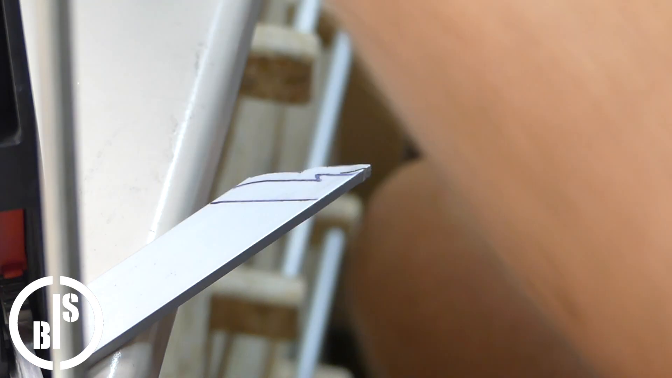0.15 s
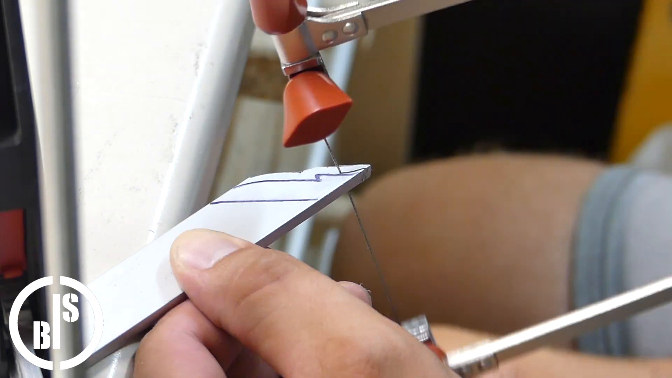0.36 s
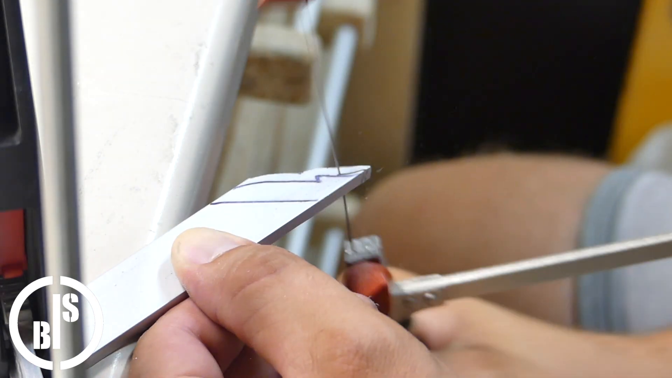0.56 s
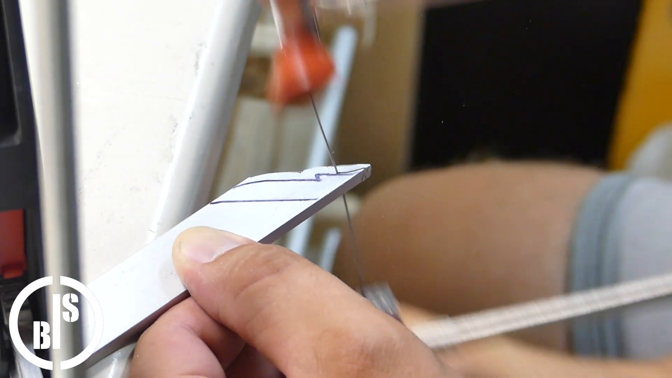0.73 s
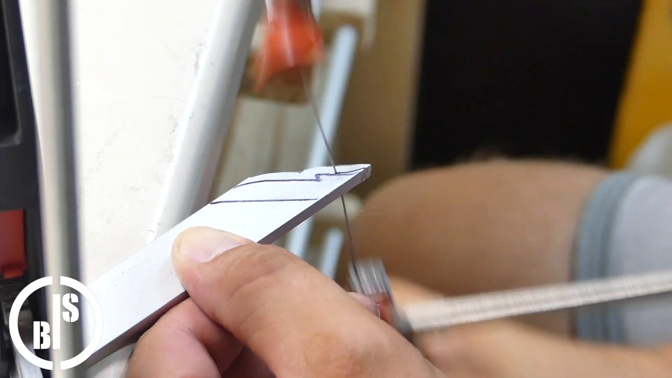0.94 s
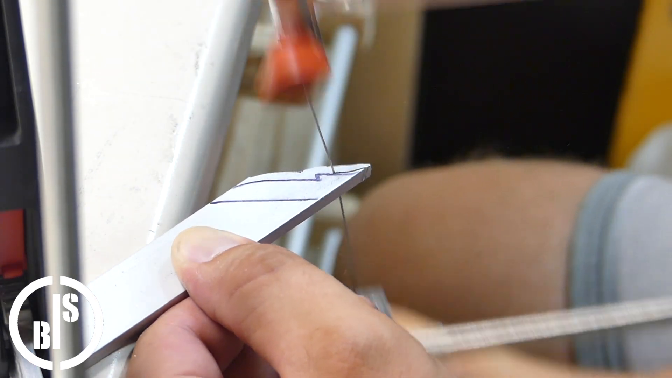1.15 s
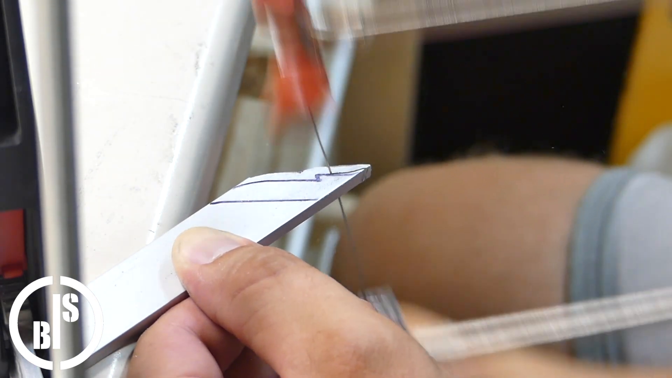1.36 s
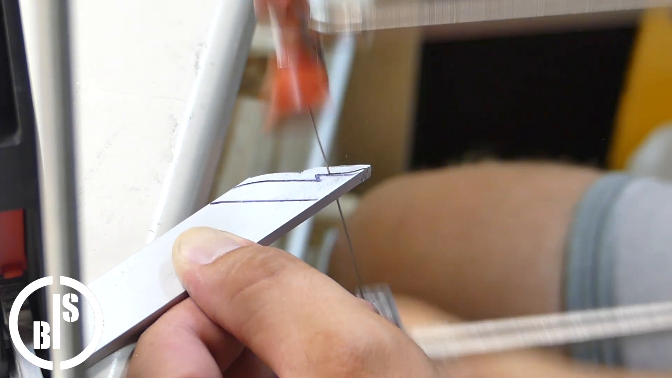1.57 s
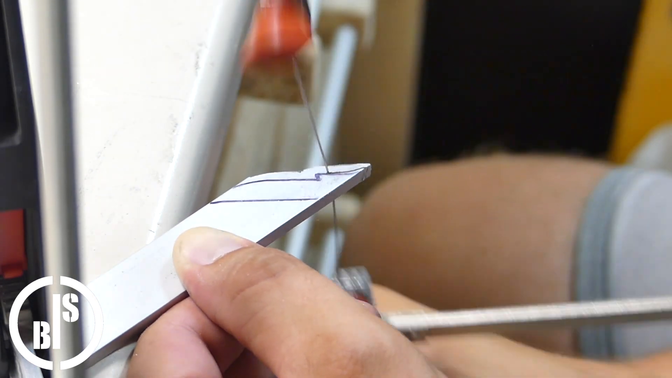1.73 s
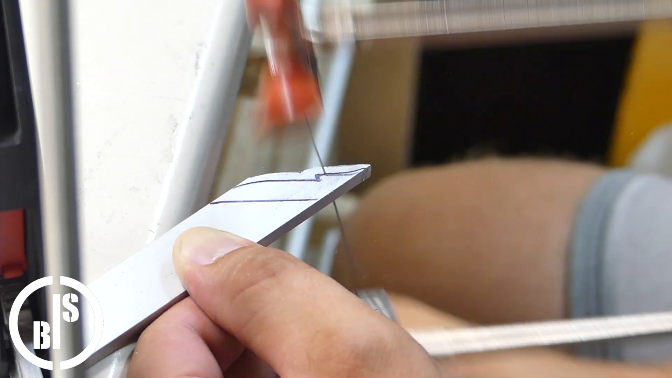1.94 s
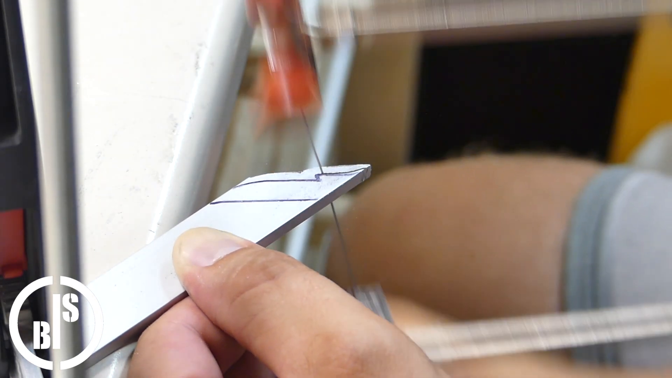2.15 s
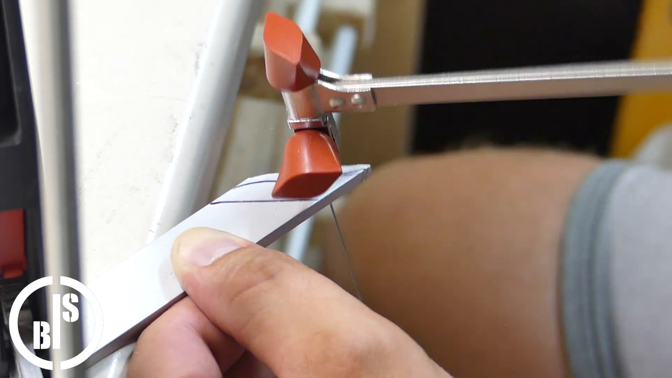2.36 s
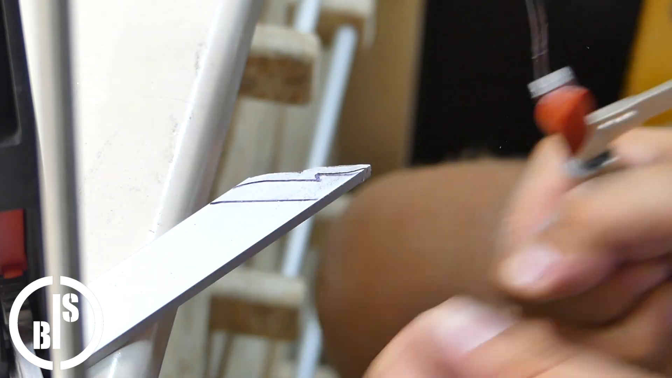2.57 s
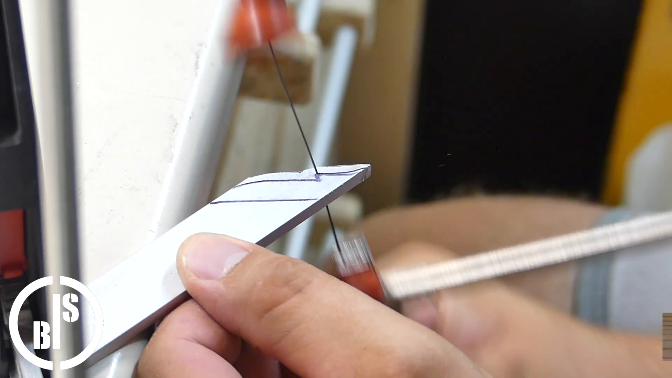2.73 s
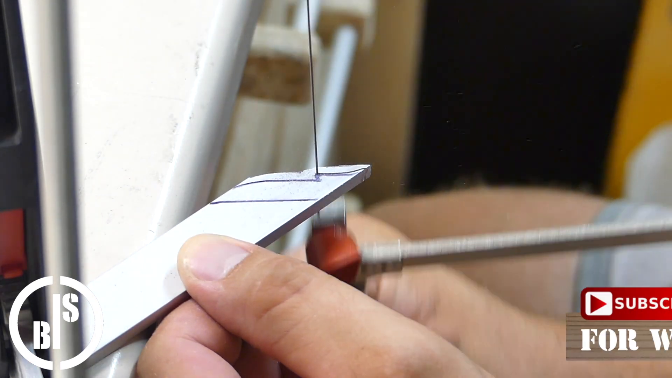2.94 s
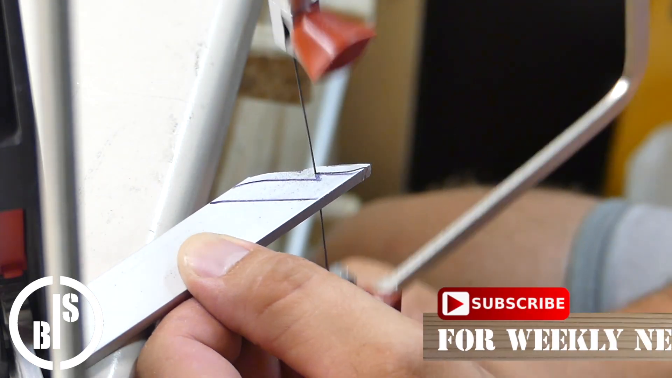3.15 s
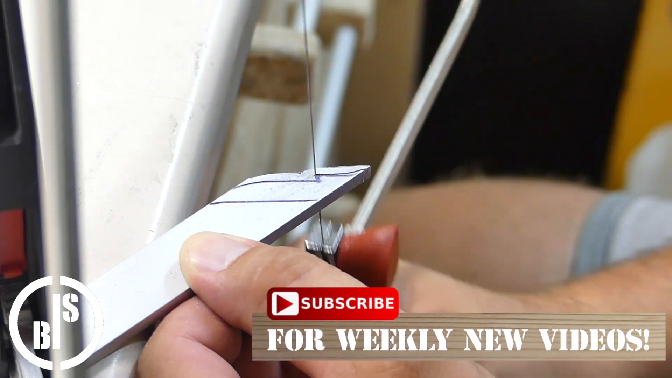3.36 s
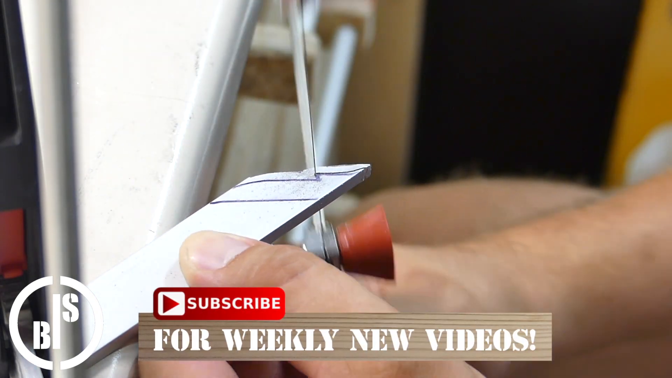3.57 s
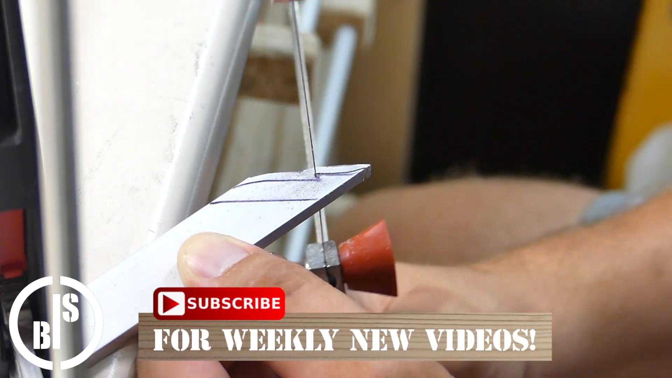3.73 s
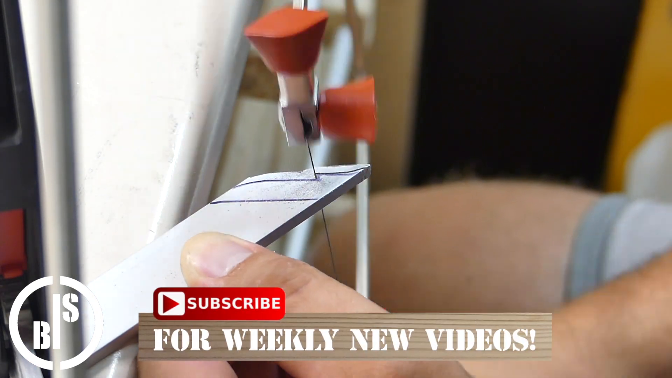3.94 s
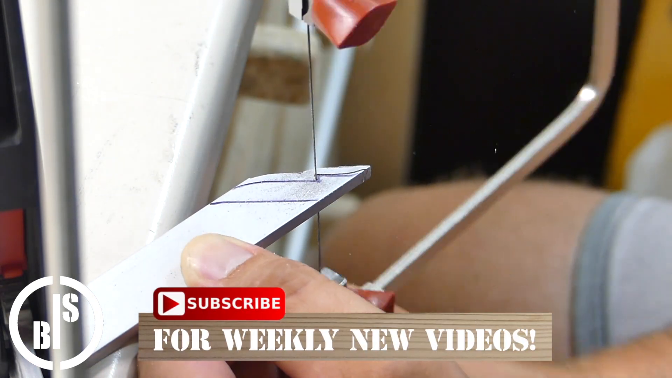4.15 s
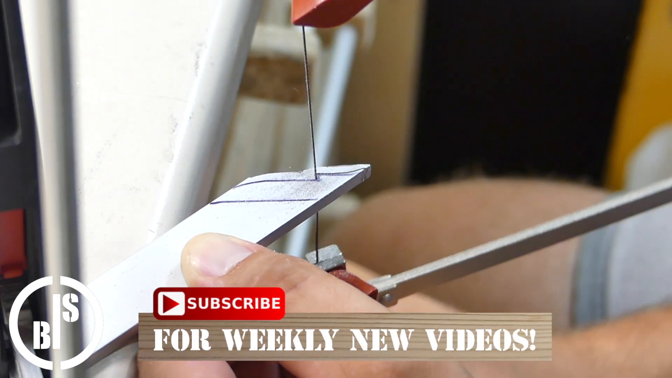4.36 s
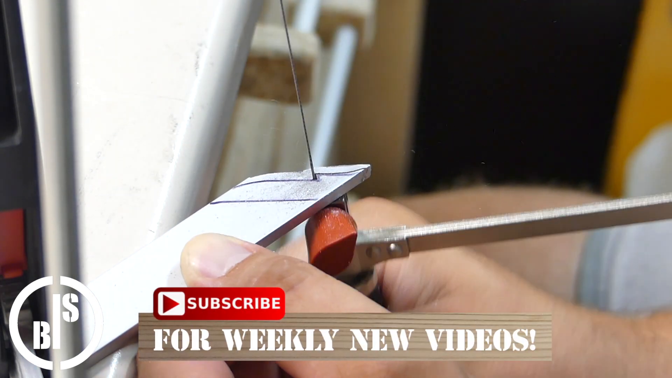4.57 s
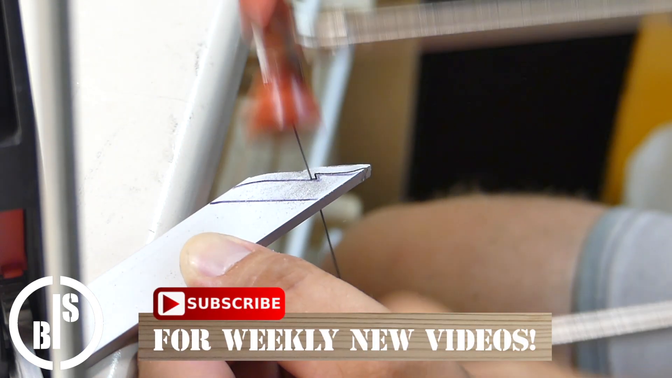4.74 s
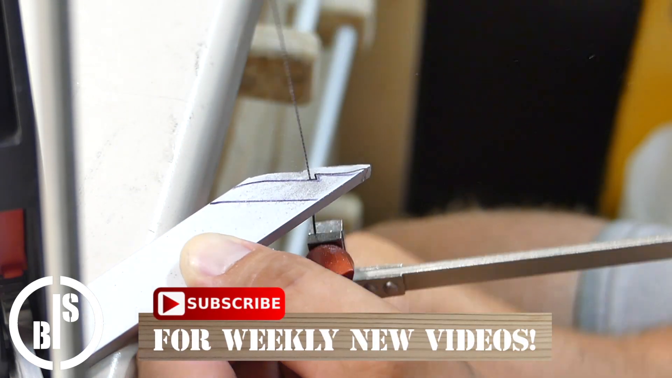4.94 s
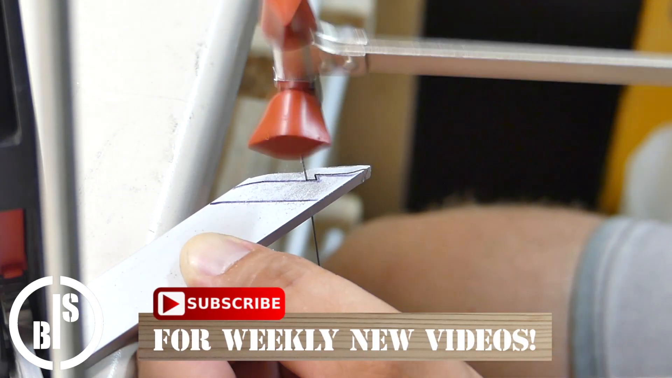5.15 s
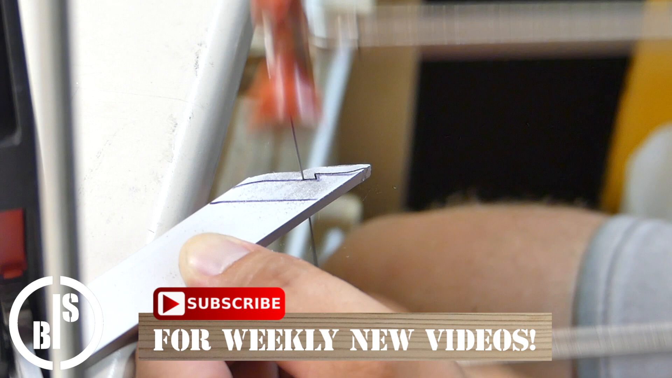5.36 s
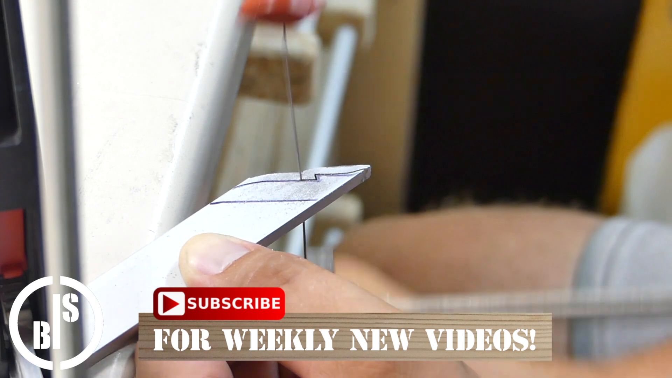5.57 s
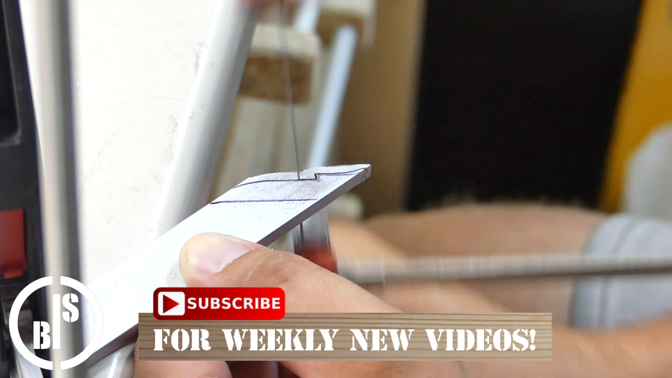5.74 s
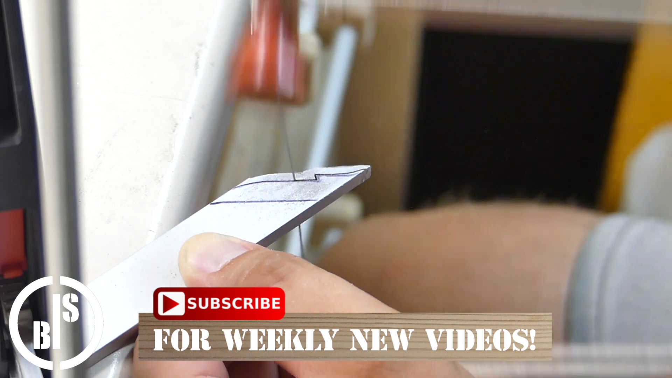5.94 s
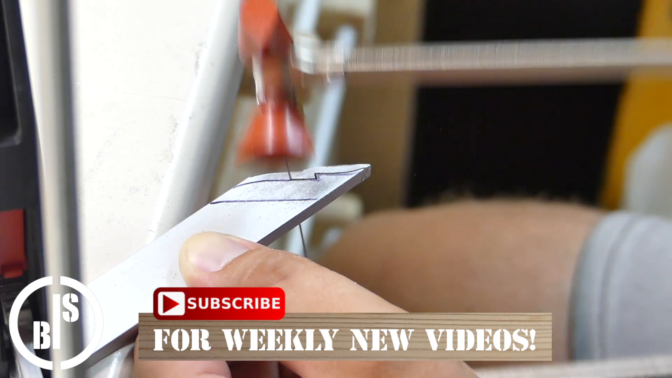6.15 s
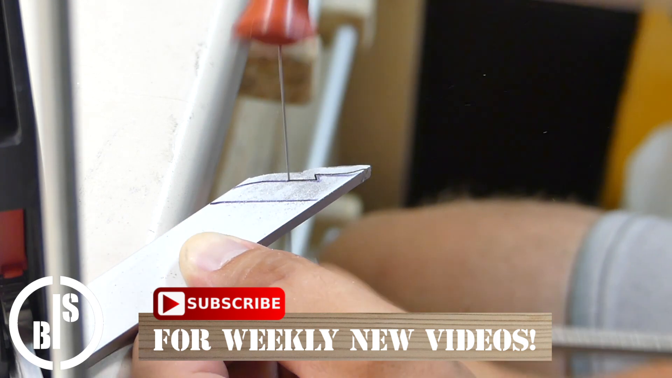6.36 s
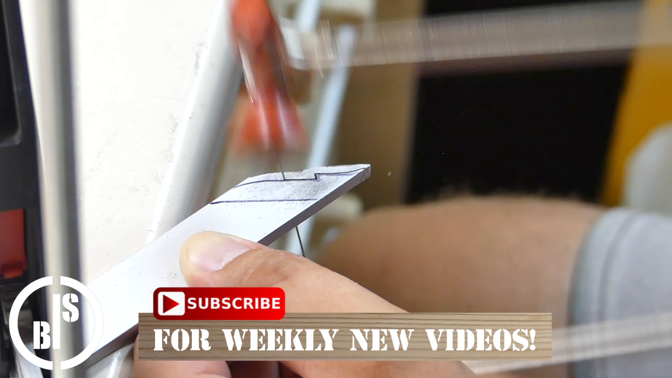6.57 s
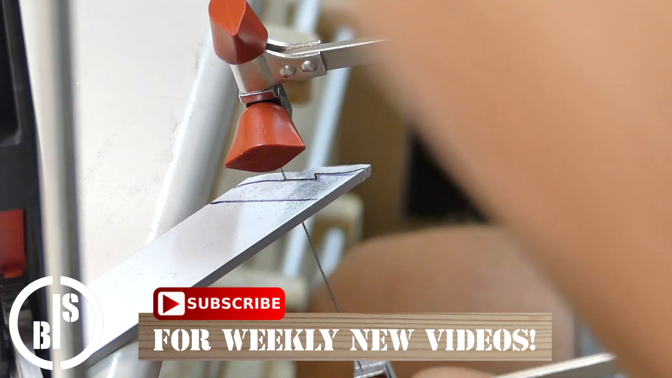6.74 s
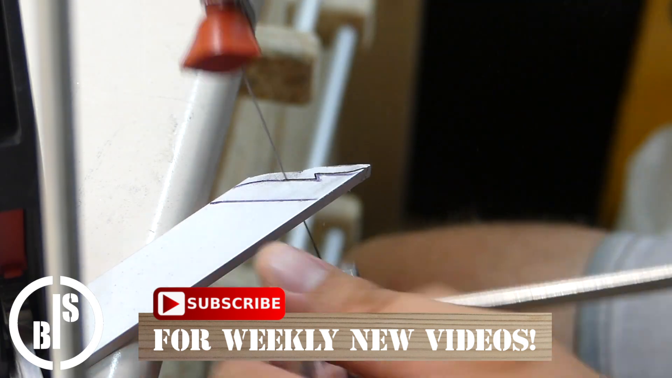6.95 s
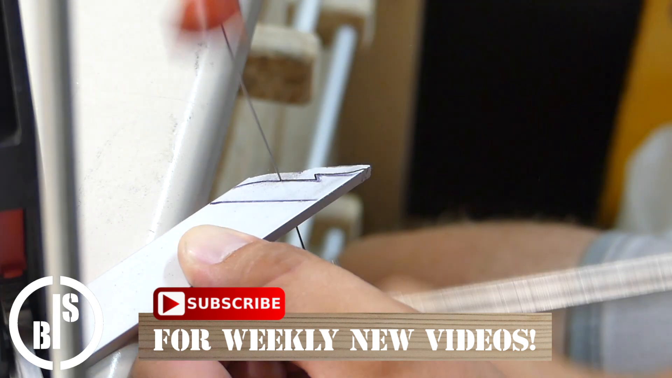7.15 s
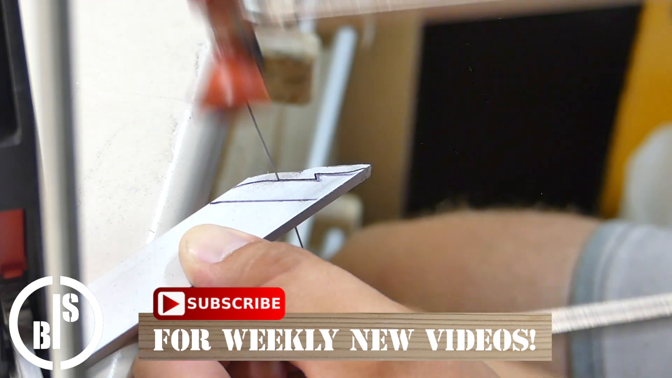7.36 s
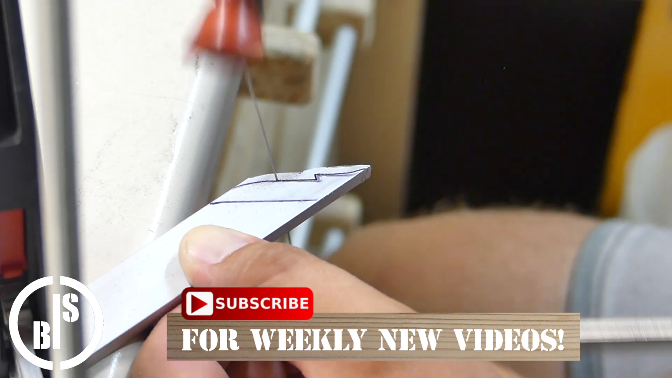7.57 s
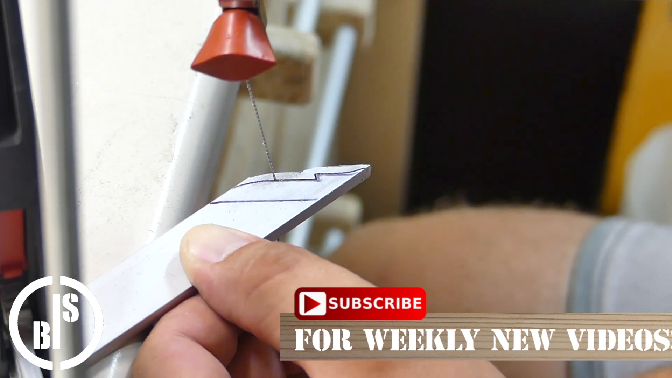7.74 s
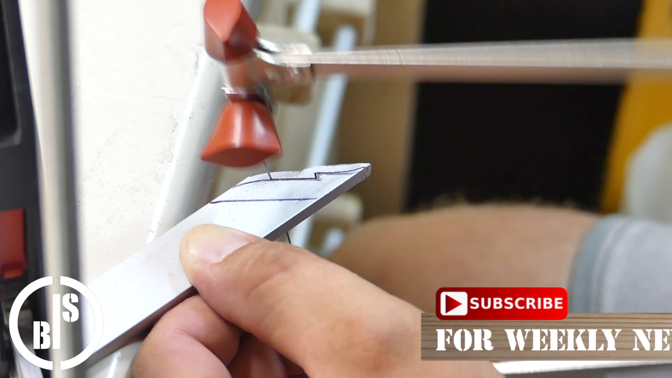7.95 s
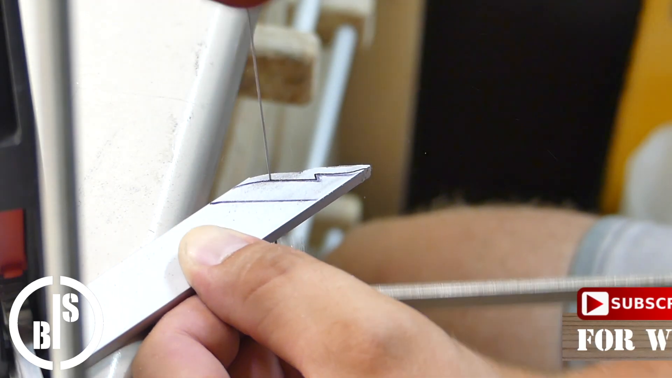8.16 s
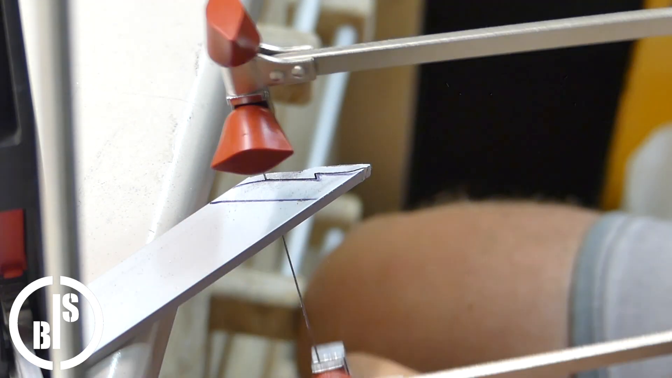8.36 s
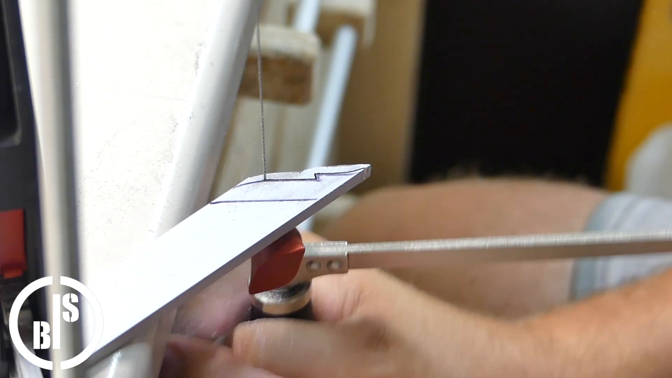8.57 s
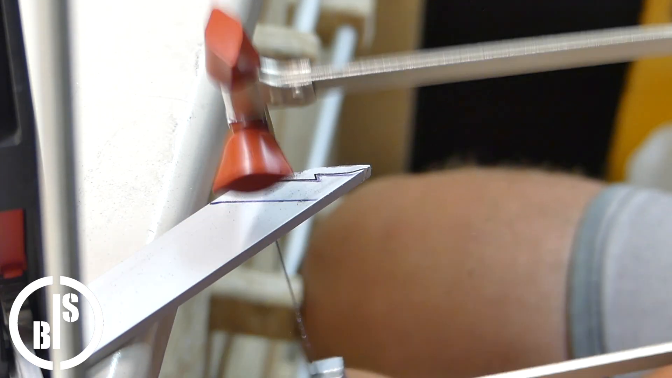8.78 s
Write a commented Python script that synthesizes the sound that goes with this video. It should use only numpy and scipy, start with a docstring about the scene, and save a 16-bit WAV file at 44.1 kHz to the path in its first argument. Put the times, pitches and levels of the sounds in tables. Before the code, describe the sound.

A tiny knock and light blade touch in a quiet workshop, then a fine hand saw works busily through a thin aluminium strip. Fast, uneven strokes combine a hollow midrange boom and gritty metallic rasp, abruptly chopped as if sped up. Snags thump often, a short squeak and frame clicks come past the middle, and a few very short gaps interrupt. Close stereo microphone, dry, little room.

```python
"""A knock and a brief touch of the blade over a faint workshop, then the busy rasp of a fret saw.
A thin blade cuts a hand-held aluminium strip, sped up: short pieces of sound butted with hard cuts.
Tooth clicks ring the boom of strip and support near 500 Hz, chip clicks ring the strip's higher modes.
Snags are single boom pulses, squeaks are rising rough tones; noise bursts ring the frame and handle as
knocks, and shaped steady noise is the quiet workshop in the pauses."""
import sys
import numpy as np
from scipy import signal
from scipy.fft import rfft, irfft, next_fast_len
from scipy.io import wavfile
from scipy.ndimage import uniform_filter1d

SR = 44100
rng = np.random.default_rng(int(sys.argv[2]) if len(sys.argv) > 2 else 0)


def field_ratio(decibels):
    """Amplitude ratio for a level in dB (20 dB per decade); scalars and array-likes work."""
    return 10 ** (np.asarray(decibels, dtype=float) / 20)


def master(y):
    """Save y as 16-bit WAV."""
    cut = np.clip(np.atleast_2d(y).T, -1, 1)
    pcm = np.round(cut * 32767)  # scale
    wavfile.write(sys.argv[1], SR, pcm.astype(np.int16))


N = 388499  # length in samples

# workshop noise spectrum: pitch_hz, relative density_db (dB per Hz)
SHOP_SPECTRUM = [(18, -46), (30, -14), (100, 0.5), (140, -4.5), (234, -1.5), (698, -13.5), (794, -20),
                 (1270, -14), (1780, -25), (15000, -36)]
# stereo width: pitch_hz, side_minus_mid_db
SIDE_SPECTRUM = [(60, -5), (110, -10), (200, -7), (380, -10.5), (700, -13), (1290, -6.5), (2380, -8.5),
                 (4400, -10.5), (8120, -8), (15000, -3.5)]
# stereo lean: pitch_hz, left_minus_right_db
LEFT_SPECTRUM = [(500, -1), (1300, 0.8), (2400, 2.5), (8000, .4)]
# modes of the saw frame: pitch_hz, width_hz, relative level_db
FRAME_MODES = [(1220, 100, 14.5), (1453, 140, 17), (2010, 55, 12.5), (2400, 300, 10), (3000, 60, 5.5),
               (3590, 89, 4), (4600, 160, 1), (4950, 92, 6), (5390, 100, 2), (5480, 220, 9.5),
               (5950, 120, 10), (6480, 160, -3)]
# frame knocks: start_s, level_db (rms before stereo), lasts_s, t60_s of the blow,
# struck_hz (mode struck hardest), fall_db (per octave, for the other modes)
FRAME_KNOCKS = [(.008, -62.5, 0.029, 0.14, 1440, 15), (.01, -66.5, 0.03, 0.11, 3100, 38),
                (.331, -74, .012, 0.16, 2400, 25), (4.242, -54.5, 0.02, 0.4, 2060, 24),
                (5.008, -66, 0.016, 0.12, 3270, 28), (5.184, -52, 0.02, 0.3, 2900, 25),
                (6.043, -50, 0.0085, .2, 5000, 1), (6.574, -62, 0.0045, .05, 3500, 13),
                (6.612, -49, 0.0037, .03, 5800, 3), (6.7358, -67, .002, 0.018, 3000, 0),
                (6.871, -86, 0.021, 0.3, 3000, 40), (7.219, -45.5, 0.005, 0.05, 3000, 3),
                (7.224, -50, 0.022, 0.056, 3000, 4), (7.274, -55, 0.012, 0.059, 3980, 2)]
# saw strokes, each from the turn of the hand to the next row: start_s, boom_db, rasp_db,
# turn_dip_db (positive: quieter at the turn, negative: louder)
SAW_STROKES = [(0.381, -43.5, -51, 7.5), (0.5879, -49, -53.5, 3.5), (0.683, -47.5, -54.5, 2.5),
               (0.8153, -45.5, -52, 4.5), (0.984, -45, -48.5, 9), (1.185, -43.5, -51.5, 5),
               (1.369, -46, -51.5, 7.5), (1.5746, -53, -62.5, -4.5), (1.623, -45.5, -52.5, 3),
               (1.7446, -49.5, -56, 3.5), (1.8266, -41, -51.5, 7.5), (1.998, -47, -53.5, 5.5),
               (2.249, -46.5, -53.5, 6.5), (2.421, -45, -54.5, 0), (2.5515, -56.5, -60, -2.5),
               (2.686, -45.5, -52, 7), (2.757, -44.5, -47.5, 4), (2.898, -45.5, -53, -2),
               (3.072, -55.5, -63.5, -0.5), (3.1054, -56, -68.5, -3), (3.155, -47.5, -51.5, 5),
               (3.2026, -48, -59, 1), (3.359, -49, -59, 2), (3.443, -48, -57, 3.5), (3.709, -45.5, -57, 3),
               (3.831, -46, -53, 2.5), (3.9618, -44.5, -50.5, 2), (4.1217, -42.5, -52.5, 2),
               (4.2176, -48, -62, 2), (4.232, -47.5, -65, 1.5), (4.301, -47.5, -55, 2.5),
               (4.3963, -46.5, -56.5, -3.5), (4.469, -44, -53, 7.5), (4.6, -44, -50.5, 0.5),
               (4.732, -44.5, -51.5, 2), (4.8678, -45, -51.5, 0.5), (4.9518, -48, -56, 2),
               (5.0375, -46.5, -55.5, 0.5), (5.1565, -49.5, -57, 0), (5.2034, -38.5, -47.5, 7.5),
               (5.2431, -47, -57, 2), (5.3282, -49, -57.5, 4.5), (5.4596, -47.5, -57, 2.5),
               (5.6754, -47, -57.5, 4), (5.796, -47, -59, 0), (5.879, -49, -59.5, 0.5),
               (6.05, -48.5, -56.5, 0.5), (6.183, -45.5, -54.5, 0), (6.315, -45, -57.5, 1),
               (6.4838, -46.5, -56, 1), (6.6148, -47, -57.5, 2), (6.99, -44.5, -52.5, 1.5),
               (7.097, -42.5, -52, 3), (7.1609, -47, -58, -0.5), (7.2446, -44.5, -56, 3.5),
               (7.462, -49, -62, 3), (7.6294, -48.5, -57.5, 5.5), (7.7609, -50.5, -63.5, 3.5),
               (7.8806, -49, -57, 0), (7.9778, -50.5, -64.5, 1.5), (8.101, -44, -54, 5),
               (8.2214, -43, -53, 2), (8.3176, -41.5, -53, 5), (8.486, -42, -55.5, 2),
               (8.5678, -48, -55, 1.5), (8.656, -46, -57.5, -1.5), (8.738, -45.5, -55, -0.5)]
# pauses and light touches, each until the next row: start_s, boom_db, rasp_db,
# change_db (positive: the rasp climbs to its level, negative: it sinks to it)
SAW_PAUSES = [(0, -82, -99, -14), (0.01, -60.5, -70, -3), (0.042, -86, -75, 15), (.1761, -82, -96.5, -16),
              (0.285, -68, -74, 9), (1.608, -57, -76, -11), (2.601, -98, -81, 24), (3.0281, -75, -84, 1),
              (3.2752, -68, -74, 4), (3.3, -55.5, -63, 3), (3.326, -63.5, -74, 5), (4.266, -90, -108, -2),
              (6.653, -91, -96, -2), (6.7735, -80, -67, 13), (6.9674, -82, -63.5, 1.5)]
# how the work is held: start_s, turn of the blade in the cut (0-1), grip on the strip (0-1),
# freedom of the strip's tip (0-1)
HOLD_CURVE = [(0, 0, 0.1, 0.97), (1.5, 0, 0.06, 0.38), (2.6, 0, 0, 0.56), (2.75, 1, 0.04, 0.54),
              (3.4, 0.3, 0, 0.52), (4.0, 0.8, 0.13, 0.57), (4.9, 0.78, 0.12, 0.3), (5.6, 0.2, 0.12, 0.2),
              (6.6, 0.26, 0.3, 0.34), (7.0, 0.07, 0.18, 0.4), (7.5, 0.13, 0.42, 0.56), (8.0, 0, 0.53, 0.82),
              (8.2, 0.24, 0.68, 0.4), (8.81, 0.04, 0.98, 0.3)]
# what the hold does to the support (first row), then to each ring group in order:
# rest_db, full_turn_db, full_grip_db, free_tip_db
HOLD_LEVELS = [(-0.5, -2, -4, 3), (-1.5, 0, -1.5, -2.5), (-2, 7.5, -8.5, -4), (-2, -2, 8, 4.5),
               (1, 4.5, -39, 8), (-4.5, -15, 10, -4.5), (-4.5, 6.5, 12, -0.5), (-20.5, 4, 28.5, -3.5),
               (-13.5, -4, -14, 17.5)]
# slow drift of the outer bands: start_s, treble_db (rings over 8 kHz), bass_db (support under 350 Hz, rumble)
BAND_DRIFT = [(.4, 5, 4.5), (1.1, 0.5, -3), (1.8, -6, 3.5), (2.7, -1, 0.5), (3.6, 3.5, 3.5), (4.3, 1, 2.5),
              (5.0, 3.5, -5.5), (5.6, 1, 1), (6.3, 1.5, 0), (7.0, 6, 1.5), (7.8, 4, 8), (8.3, 2, -0.5),
              (8.81, -2.5, -7)]
# centre of the favoured boom modes, before its swing and scatter: start_s, pitch_hz
BOOM_CENTRE = [(0, 498), (1.5, 514), (2.4, 480), (3.3, 495), (4.2, 501), (4.7, 488), (5.4, 490), (5.9, 470),
               (6.6, 471), (7.2, 445), (7.8, 497), (8.5, 448), (8.81, 489.8)]
# boom modes of strip and support, each resonator run twice: pitch_hz, width_hz, relative level_db (per run)
BOOM_MODES = [(413, 75, 2.5), (471.2, 106, 4), (525, 20, 4.5), (594, 54, -0.5)]
# low and high modes of the support, two groups: pitch_hz, width_hz, relative level_db
SUPPORT_MODES = [
    [(149.8, 17, -14), (226.5, 27, -11.5), (348, 19.3, -7.5)],
    [(679.4, 33.6, -2), (800, 214, -16)],
]
# ring groups of strip and support: pitch_hz, width_hz, relative level_db
RING_GROUPS = [
    [(1048, 267, 10), (1133, 19, 16), (1218, 152, 2), (1440, 67, 14), (1594, 52, 8.5), (1934, 173, 8.5)],
    [(2225, 250, 10.5), (2429, 129, 15), (2663, 24, 14), (2834, 48, 11.5), (3105, 140, -1.5)],
    [(3380, 98, -3), (3726, 84, 0.5), (4570, 470, -18)],
    [(4880, 100, -11.5), (5440, 120, -6.5), (5800, 300, -15), (6026, 110, -5), (6440, 250, -11),
     (6920, 400, -19.5)],
    [(8560, 150, -29), (9610, 340, -2.5), (9990, 93, -5.5), (10080, 370, -5.5), (10820, 1440, -13.5)],
    [(12180, 1170, -19), (13300, 820, -13), (14100, 1300, -17)],
    [(3480, 300, -6.5), (3610, 280, 2.5)],
    [(2945, 360, 5), (3500, 650, -1)],
]
# dark valley in the treble: start_s, pitch_hz, depth (0-1)
TREBLE_VALLEY = [(4.7, 8970, 0.15), (5.0, 8650, 0.6), (5.4, 7500, 0.5), (5.75, 7150, .7), (6.0, 7000, 0.04)]
# modes of the wooden handle: pitch_hz, width_hz, relative level_db
HANDLE_MODES = [(348, 120, -7), (657, 54, 4.5), (805, 44, 3.5), (1054, 34, -16), (1270, 45, -17),
                (1810, 90, -14)]
# handle knocks: start_s, level_db (rms before stereo), lasts_s, t60_s, struck_hz, fall_db (per octave)
HANDLE_KNOCKS = [(0.287, -70, 0.04, 0.082, 400, 3.8), (6.7355, -58.5, 0.038, 0.14, 800, .3)]
# snags of the blade: start_s, peak_db (before stereo), pitch_hz
BLADE_SNAGS = [(.447, -44, 440), (0.493, -42, 472), (.655, -36.5, 522), (.686, -36.5, 495),
               (.723, -39.5, 457), (0.889, -37.5, 430), (1.22, -39, 510), (1.482, -36.5, 390),
               (1.529, -37.5, 458), (1.692, -39.5, 524), (1.724, -42.5, 562), (1.876, -42, 540),
               (1.979, -39.5, 527), (2.771, -40.5, 534), (2.962, -35, 496), (3.157, -38, 502),
               (3.192, -35.5, 508), (3.243, -37, 542), (3.418, -38, 454), (3.568, -35, 475),
               (3.876, -40, 540), (3.926, -35.5, 540), (4.02, -37.5, 556), (4.146, -37, 525),
               (4.397, -38.5, 516), (4.517, -42.5, 463), (4.671, -33.5, 512), (4.791, -36, 455),
               (5.008, -35, 476), (5.422, -39, 516), (5.759, -40.5, 505), (5.995, -40.5, 487),
               (6.053, -36, 504), (6.102, -34, 462), (6.148, -40, 460), (6.373, -41.5, 508),
               (6.45, -34.5, 493), (6.517, -34.5, 486), (6.571, -40.5, 457), (6.998, -42, 525),
               (7.048, -36, 480), (7.149, -36.5, 506), (7.375, -43, 477), (7.67, -39, 503),
               (7.722, -48, 543), (7.962, -38, 503), (8.164, -38, 452), (8.207, -32, 480),
               (8.311, -42, 498), (8.392, -33.5, 472), (8.466, -44, 462), (8.57, -34, 460),
               (8.641, -35.5, 465), (8.744, -36, 522)]
# squeaks of the blade: start_s, lasts_s, level_db (rms before stereo), from_hz, to_hz
BLADE_SQUEAKS = [(5.185, 0.0206, -49, 988, 1340), (7.749, 0.013, -54, 1050, 1100)]


def unit(x):
    """Scale to rms 1."""
    return x / np.sqrt(np.mean(x ** 2))


def on_log(hz, table):
    """Read a pitch_hz, value table on a log-frequency axis."""
    f, v = np.transpose(table)
    return np.interp(np.log(np.maximum(hz, 1)), np.log(np.maximum(f, 1)), v)


def over_time(table):
    """Draw the columns of a start_s table as straight lines over every sample."""
    s, *columns = np.transpose(table)
    return [np.interp(np.arange(N) / SR, s, c) for c in columns]


def ring(x, modes):
    """Two-pole resonators side by side, neighbours in opposite phase."""
    out = 0
    for k, (hz, width_hz, db) in enumerate(modes):
        b, a = signal.iirpeak(hz, hz / width_hz, fs=SR)
        out = out + (-1) ** k * field_ratio(db) * signal.lfilter(b, a, x)
    return out


def band(x, lo_hz, hi_hz):
    """Butterworth band-pass."""
    return signal.sosfilt(signal.butter(2, [lo_hz, hi_hz], "band", fs=SR, output="sos"), x)


def stereo(pair):
    """Middle and side to left and right; part of the side is the middle, phase-shifted by a bench echo."""
    lag_share, echo_s = 0.61, 0.00055
    size = next_fast_len(N)
    hz = np.fft.rfftfreq(size, 1 / SR)
    mid = rfft(pair[0], size)
    own = np.sqrt(1 - lag_share) * rfft(pair[1], size)
    # a quarter turn of phase, now one way, now the other along the spectrum
    lagged = 1j * np.cos(2 * np.pi * hz * echo_s) * np.sqrt(2 * lag_share) * mid
    side = (own + lagged) * field_ratio(on_log(hz, SIDE_SPECTRUM))
    lean = field_ratio(on_log(hz, LEFT_SPECTRUM) / 2)
    return irfft(np.array([(mid + side) * lean, (mid - side) / lean]), size)[:, :N]


def shop():
    """Faint room noise, dull and steady: random noise shaped to a fixed spectrum."""
    level_db = -78  # rms
    hz = np.fft.rfftfreq(N, 1 / SR)
    noise = irfft(rfft(rng.standard_normal((2, N))) * field_ratio(on_log(hz, SHOP_SPECTRUM)), N)
    return field_ratio(level_db) * unit(stereo(noise))


def knocks(rows, body):
    """A short rattle rings the body, modes far from the one struck hardest weaker; cuts bound each knock."""
    out = np.zeros((2, N))
    lead = int(.004 * SR)  # the body already rings this long when the knock cuts in
    for start_s, db, lasts_s, t60_s, struck_hz, fall_db in rows:
        count, i = int(lasts_s * SR), int(start_s * SR)
        fade = field_ratio(-60 * np.arange(count + lead) / SR / t60_s)
        blow = rng.standard_normal((2, count + lead)) * fade
        modes = [(hz, width, g - fall_db * abs(np.log2(hz / struck_hz))) for hz, width, g in body]
        out[:, i:i + count] += field_ratio(db) * unit(ring(blow, modes)[:, lead:])
    return stereo(out)


def frame_knocks():
    """The saw frame knocks: noise blows ring its modes."""
    return knocks(FRAME_KNOCKS, FRAME_MODES)


def clicks(per_s, spread_db):
    """Two unrelated streams of uneven clicks: one for the middle, one for the sides."""
    hit = rng.random((2, N)) < per_s / SR
    size = field_ratio(spread_db * rng.exponential(size=(2, N))) * rng.standard_normal((2, N))
    return unit(hit * size)


def flutter(rate, depth_db):
    """Wavering hand pressure: random levels, rate per second, smoothed; depth is before smoothing."""
    k = int(SR / rate)
    steps = np.repeat(rng.standard_normal(N // k + 1), k)
    return field_ratio(depth_db * uniform_filter1d(steps, k)[:N])


def bench(x):
    """Close reflections smear clicks into short tails, uncoloured: a chain of all-pass echoes."""
    g = 0.45  # echo strength
    size = next_fast_len(N)
    hz = np.fft.rfftfreq(size, 1 / SR)
    spectrum = rfft(x, size)
    for echo_s in np.geomspace(.0011, .0083, num=5):
        z = np.exp(-2j * np.pi * hz * echo_s)
        spectrum = spectrum * (z - g) / (1 - g * z)
    return irfft(spectrum, size)[:, :N]


def dense(x):
    """Many faint, closely packed modes of the strip give the treble a fine fixed ripple."""
    level_db, t60_s = -9, .05
    count = SR // 20
    tail = rng.standard_normal(count) * field_ratio(-60 * np.arange(count) / SR / t60_s)
    tail = signal.sosfilt(signal.butter(2, 2500, "high", fs=SR, output="sos"), tail)
    tail = tail / np.sqrt(np.sum(tail ** 2))
    return x + field_ratio(level_db) * signal.fftconvolve(x, tail[None])[:, :N]


def cuts():
    """Split every stroke and pause into near-equal pieces, each lifted from a far-off place in the sound.
    Gives piece and source of each sample; row, next row, number in the row and row count of each piece."""
    piece_s, block_s, block_start_s = .04266, .01206, .0094  # mean piece; grid of the cuts
    # the last column marks strokes with 1, pauses with 0
    rows = np.array(sorted([(*r, 1) for r in SAW_STROKES] + [(*r, 0) for r in SAW_PAUSES]))
    s = np.append(rows[:, 0], N / SR)
    count = np.maximum(np.round(np.diff(s) / piece_s), 1).astype(int)
    row = np.repeat(np.arange(len(rows)), count)
    j = np.arange(len(row)) - np.searchsorted(row, row)
    even = s[row] + np.diff(s)[row] * j / count[row]
    # cuts inside a row fall on block edges
    on_block = np.round((even - block_start_s) / block_s) * block_s + block_start_s
    start = np.where(j > 0, on_block, even)
    piece = np.maximum(np.searchsorted(start * SR, np.arange(N), side="right") - 1, 0)
    source = (np.arange(N) + rng.integers(N, size=300)[piece]) % N
    after = rows[np.minimum(row + 1, len(rows) - 1)]
    return piece, source, rows[row], after, j, count[row]


def effort(row, after, j, count):
    """Boom and rasp dB of each piece: strokes change level around their turns; touches rise or sink evenly."""
    turn_sharp, turn_skew, boom_dip_share, waver_db = 4.8, 0.92, 0.89, 1.
    _, boom_db, rasp_db, dip_db, stroke = row.T
    place = (j / count) ** turn_skew
    nearest_dip_db = np.where(place < .5, dip_db, after[:, 3] * after[:, 4])
    turn_db = nearest_dip_db * np.abs(np.cos(np.pi * place)) ** turn_sharp
    change_db = dip_db * (1 - j / np.maximum(count - 1, 1))
    waver = waver_db * rng.standard_normal((2, len(j))) * stroke
    boom_db = boom_db - boom_dip_share * stroke * turn_db + waver[0]
    return boom_db, rasp_db - np.where(stroke, turn_db, change_db) + waver[1]


def play(x, piece, db, stroke):
    """Give every piece its rms level; a piece of a stroke leans towards the levels of its neighbours."""
    glide_share = .9  # how far a piece follows the level curve of its stroke
    length = np.maximum(np.bincount(piece), 1)
    lean_db = np.interp(np.arange(N), np.cumsum(length) - length / 2, db) - db[piece]
    x = x * field_ratio(glide_share * np.clip(lean_db, -4, 4) * stroke[piece])
    power = np.bincount(piece, np.mean(x ** 2, axis=0)) / length
    return x * (field_ratio(db) / np.sqrt(power + 1e-18))[piece]


def boom_of_strip(bites, source, centre_hz, support_db, bass_db, angle):
    """Soft tooth bites push the boom and support modes; the boom modes near centre_hz are favoured."""
    favour_hz, scatter_db, rumble_db = 57.4, 2.5, -31.5  # rumble before drift and scatter
    # the soft bite carries little treble
    push = band(bites, 72, 1220)
    boom = 0
    for mode in BOOM_MODES:
        favour = np.exp(-.5 * ((mode[0] - centre_hz) / favour_hz) ** 2)
        # ringing each mode twice makes its flanks fall steeply
        boom = boom + favour * ring(ring(push, [mode]), [mode])[:, source]
    for db, a, modes in zip((support_db + bass_db, support_db), angle[6:], SUPPORT_MODES):
        boom = boom + field_ratio(db + scatter_db * a) * ring(push, modes)[:, source]
    rumble = unit(band(bites, 49, 183)[:, source])
    return unit(boom) + field_ratio(rumble_db + bass_db + scatter_db * angle[8]) * rumble


def seated(x, modes, seating):
    """The blade sits in the cut in one of two ways, with slightly other mode pitches and strengths."""
    detune, uneven_db = .008, 2.5  # spread of pitch (share) and level before centring
    chance = rng.standard_normal((2, len(modes), 2))
    chance = chance - chance.mean(axis=0)
    ways = []
    for way in chance:
        shifted = [(hz * (1 + detune * a), width, db + uneven_db * b)
                   for (hz, width, db), (a, b) in zip(modes, way)]
        ways.append(ring(x, shifted))
    return np.choose(seating, ways)


def valley(x):
    """A dark notch slides through the treble: fixed bands 500 Hz apart are taken out in turn."""
    hz, depth = over_time(TREBLE_VALLEY)
    taken = 0
    for f in np.arange(6500, 10000, 500):
        share = np.maximum(1 - abs(hz - f) / 500, 0)
        taken = taken + share * ring(x, [(f, 1100, 0)])  # 1100 Hz wide
    return x - depth * taken


def rasp_of_chips(chips, source, ring_db, angle):
    """Fine chips ring the high modes of the strip and hiss as they leave the cut."""
    blend_s, scatter_db, hiss_db = .02, 1.68, -10.5  # blend: colour change over a cut
    seating = np.repeat(rng.integers(2, size=N // 3000 + 1), 3000)[:N]
    rasp = 0
    for db, a, modes in zip(ring_db, angle, RING_GROUPS):
        gain = field_ratio(uniform_filter1d(db + scatter_db * a, int(blend_s * SR)))
        rasp = rasp + gain * seated(chips, modes, seating)[:, source]
    # the hiss is taken a second away, so it is unrelated to the rings
    hiss = unit(band(chips, 1250, 5880)[:, source - SR])
    return valley(unit(rasp) + field_ratio(hiss_db) * hiss)


def saw():
    """Tooth bites drive the boom, fine chips drive the high rings; both are cut into pieces."""
    teeth_per_s, chips_per_s = 1500, 7000  # mean click rates
    bright_db = 0.07  # dB per octave that the rasp tilts up for each dB of pressure
    swing_hz, swing_top, centre_scatter_hz = 22.7, 0.47, 32  # swing_top: place along the stroke, 0-1
    slide_below_db = -69
    piece, source, row, after, j, count = cuts()
    stroke = row[:, 4]
    boom_db, rasp_db = effort(row, after, j, count)

    turn, grip, free = over_time(HOLD_CURVE)
    support_db, *ring_db = [rest + turn_db * turn + grip_db * grip + free_db * free
                            for rest, turn_db, grip_db, free_db in HOLD_LEVELS]
    treble_db, bass_db = over_time(BAND_DRIFT)
    # harder pressure sounds brighter
    pressure_db = np.clip(rasp_db + 53.5, -12, 6)[piece]
    for k, modes in enumerate(RING_GROUPS):
        first_hz = modes[0][0]
        tilt_db = bright_db * np.log2(first_hz / 2500) * pressure_db
        ring_db[k] = ring_db[k] + treble_db * (first_hz > 8000) + tilt_db

    # every piece catches the blade at another angle, so mode groups vary in strength
    angle = rng.standard_normal((300, 10))[piece].T
    # the boom swings along each stroke with the free length of blade
    swing = swing_hz * np.cos(2 * np.pi * (j / count - swing_top))[piece]
    centre_hz = over_time(BOOM_CENTRE)[0] + swing + centre_scatter_hz * angle[9]

    bites = bench(stereo(clicks(teeth_per_s, spread_db=2) * flutter(28, depth_db=3.5)))
    chips = dense(bench(stereo(clicks(chips_per_s, spread_db=3.5))))
    chips = chips * flutter(60, depth_db=2.0) + 0.38 * bites
    boom = boom_of_strip(bites, source, centre_hz, support_db, bass_db, angle)
    rasp = rasp_of_chips(chips, source, ring_db, angle)
    # with no pressure the blade only slides: plain hiss, no rings
    slide = unit(band(chips, 420, 4900)) + 0.66 * unit(band(chips, 3300, 12400))
    rasp = np.where(((rasp_db < slide_below_db) & (stroke == 0))[piece], slide, rasp)
    return play(boom, piece, boom_db, stroke) + play(rasp, piece, rasp_db, stroke)


def handle_knocks():
    """The wooden handle knocks: noise blows ring its modes."""
    return knocks(HANDLE_KNOCKS, HANDLE_MODES)


def snags():
    """The blade snags: one hard push through two equal resonators gives a short boom that swells and fades."""
    width_hz, lead_s = 64.5, .0015  # width of each resonator; start ahead of the listed time
    out = np.zeros((2, N + SR))
    push = np.eye(1, SR // 10)[0]
    for start_s, peak_db, hz in BLADE_SNAGS:
        mode = [(hz, width_hz, 0)]
        boom = ring(ring(push, mode), mode)
        i = int((start_s - lead_s) * SR)
        out[:, i:i + len(boom)] += field_ratio(peak_db) * boom / np.max(np.abs(boom))
    return stereo(out[:, :N])


def squeaks():
    """Rough stick-slip tone that rises while the blade drags free."""
    partials_db, roughness = (7, -25), 0.56  # relative levels of fundamental and octave
    out = np.zeros((2, N))
    for start_s, lasts_s, db, from_hz, to_hz in BLADE_SQUEAKS:
        place = np.linspace(0, 1, num=int(lasts_s * SR))
        phase = 2 * np.pi * np.cumsum(from_hz + (to_hz - from_hz) * place) / SR
        noise = unit(band(rng.standard_normal((2, SR // 10)), 60, 500))
        rough = 1 + roughness * noise[:, :len(place)]
        tone = sum(field_ratio(g) * np.sin((k + 1) * phase) for k, g in enumerate(partials_db))
        swell = np.sin(np.pi * place ** 0.5)
        i = int(start_s * SR)
        out[:, i:i + len(place)] += field_ratio(db) * unit(tone * rough * swell)
    return stereo(out)


def scene():
    """Room, frame, saw, handle, snags and squeaks together."""
    return shop() + frame_knocks() + saw() + handle_knocks() + snags() + squeaks()


def band_limit(x):
    """A steep low-pass at the top of the band."""
    return signal.sosfilt(signal.butter(12, 15830, fs=SR, output="sos"), x)


def record(dry):
    """The microphone rolls off the top above 15.1 kHz."""
    mix = signal.sosfilt(signal.butter(6, 15100, fs=SR, output="sos"), dry)
    return band_limit(mix)


dry = scene()
out = record(dry)
master(out)
```